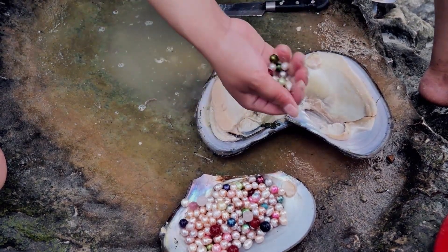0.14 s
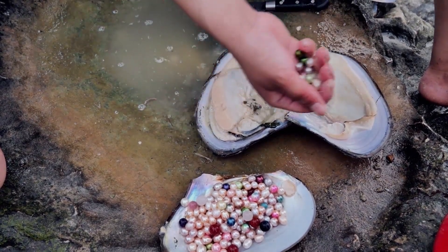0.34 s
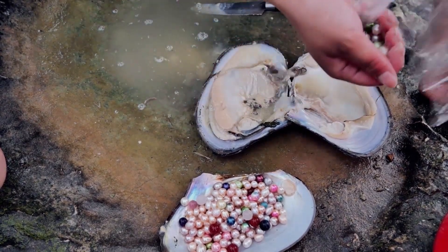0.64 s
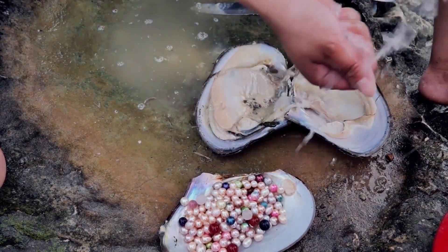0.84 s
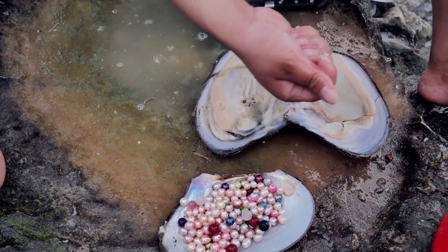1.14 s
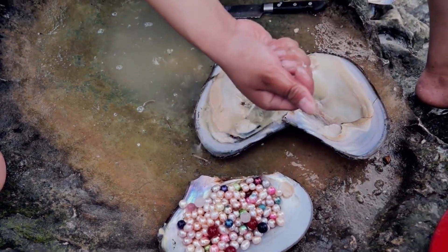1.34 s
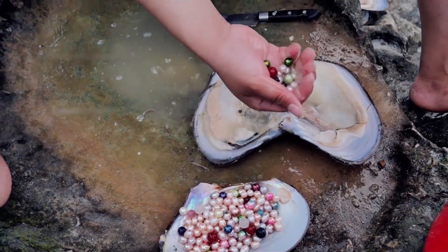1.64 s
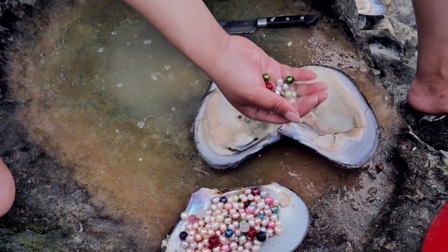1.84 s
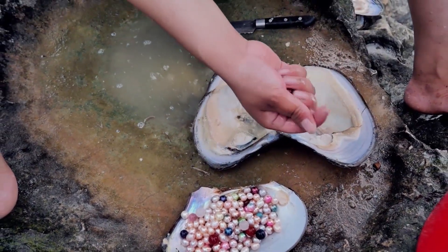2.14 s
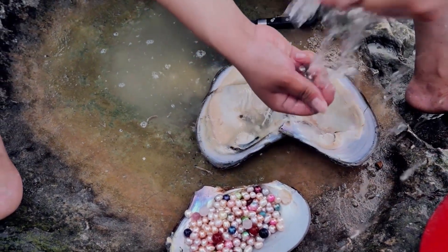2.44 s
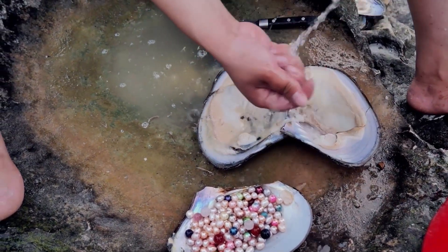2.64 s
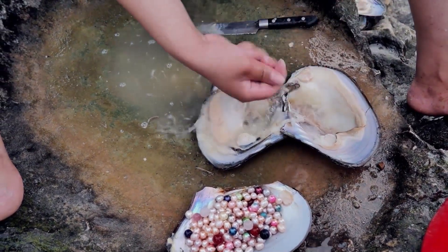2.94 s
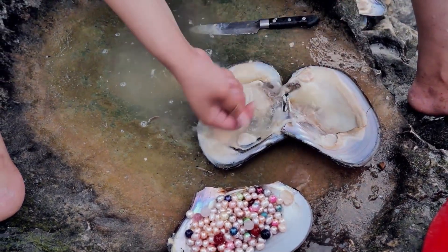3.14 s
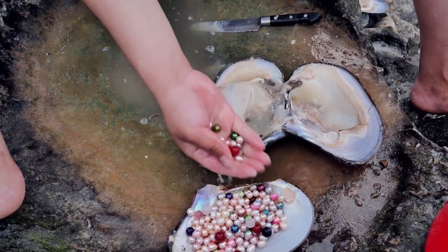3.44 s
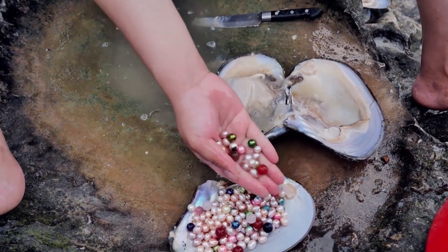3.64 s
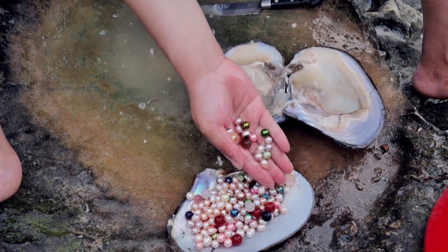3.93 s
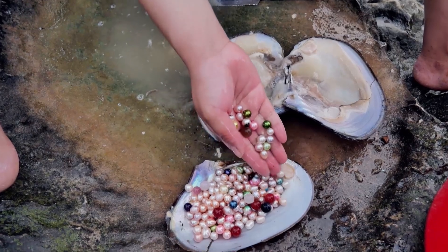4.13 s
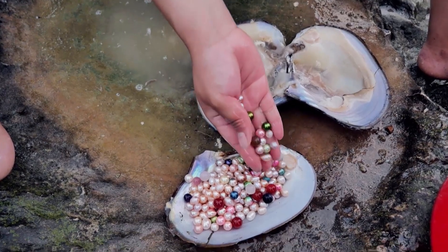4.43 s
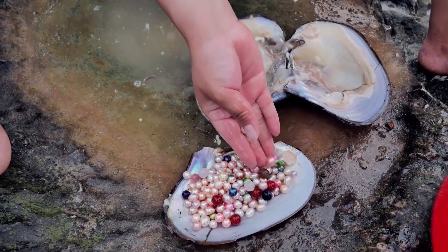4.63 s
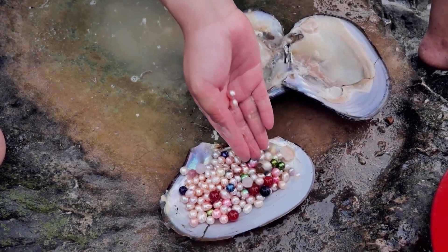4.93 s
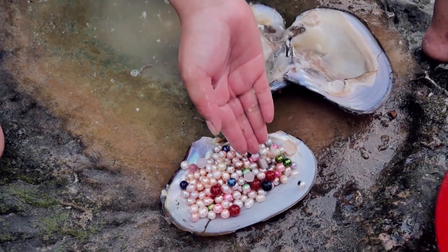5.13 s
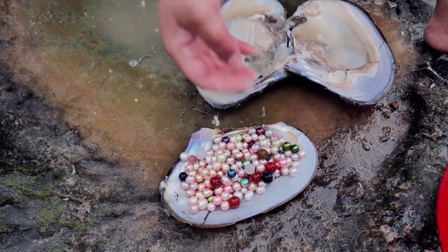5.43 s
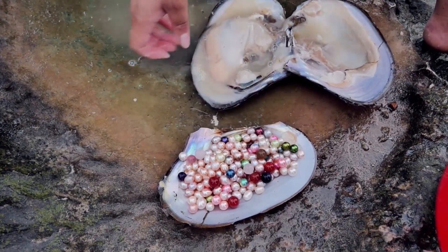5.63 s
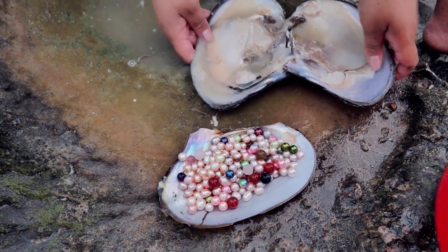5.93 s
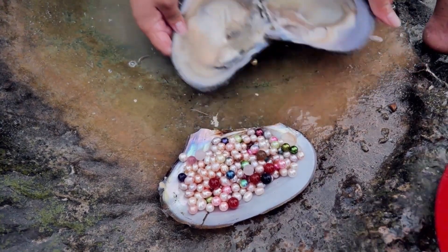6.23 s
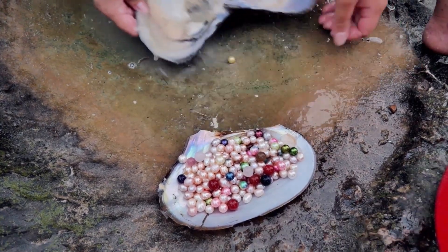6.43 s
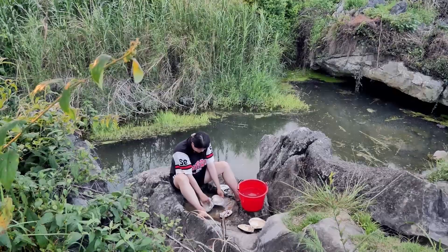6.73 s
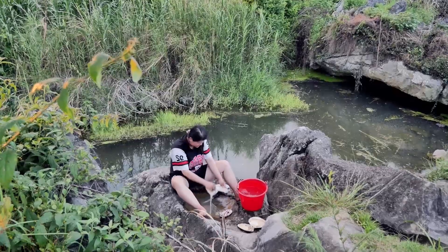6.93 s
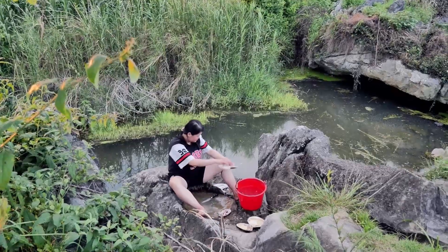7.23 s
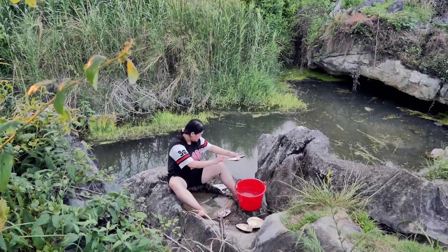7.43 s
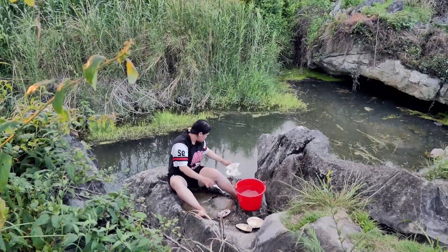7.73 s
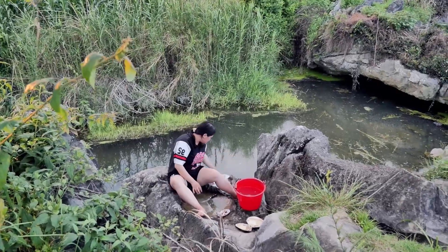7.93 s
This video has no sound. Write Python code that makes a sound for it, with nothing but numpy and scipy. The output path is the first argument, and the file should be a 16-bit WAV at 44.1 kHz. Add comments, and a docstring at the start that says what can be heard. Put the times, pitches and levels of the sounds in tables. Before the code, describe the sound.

Close to the microphone, a hand rinses pearls in a shallow creek pool with quick splashes, bubbles and fine spray. The pearls then click onto a heap in a mussel shell, and an empty shell taps faintly and knocks twice on rock. After a brief silence, the creek rushes softly, heard from the bank, with a few far splashes and a faint pulsing insect. A distant bird whistles now and then.

```python
"""Splashing, close by: a hand rinses pearls in a shallow creek pool, making slaps, ringing air bubbles
and fine spray. The pearls then click onto a heap in a mussel shell, and an empty shell taps faintly and
knocks twice as it is lifted, ringing in its damped modes. After a short silence the creek's rush is
heard from the bank, with a few far splashes and a pulsing insect. A distant bird whistles in both
scenes, and a gain control ducks the whole sound after sharp clicks."""
import sys
import numpy as np
from scipy import signal
from scipy.fft import rfft, irfft
from scipy.io import wavfile
from scipy.ndimage import uniform_filter1d

SR = 44100
rng = np.random.default_rng(int(sys.argv[2]) if len(sys.argv) > 2 else 0)


def dump_mix(stems):
    """Bounce the given channels to the path in sys.argv[1] as a 16-bit WAV at rate SR."""
    frames = np.atleast_2d(stems).T  # one column per channel
    limited = np.clip(frames, -1, 1)  # hard clip at full scale
    pcm = np.round(limited * 32767).astype(np.int16)
    wavfile.write(sys.argv[1], SR, pcm)


N = 355887
TIME, FREQS = np.arange(N) / SR, np.fft.rfftfreq(N, 1 / SR)


def amp(db):
    """Decibels to amplitude ratio."""
    return 10 ** (np.asarray(db) / 20)


def unit_rms(x):
    """Normalisation to unit mean power."""
    return x / np.sqrt(np.mean(x ** 2) + 1e-20)


def unit_onset(sound):
    """Normalisation to unit mean power over the first 5 ms."""
    return sound / np.sqrt(np.mean(sound[:, :SR // 200] ** 2))


def curve_at(points, hz):
    """Interpolation on a logarithmic frequency axis."""
    f, value = np.transpose(points)
    return np.interp(np.log(hz + 1), np.log(f + 1), value)


def add(mix, s, sound):
    """Superposition: a sound joins the mix at time s."""
    part = mix[..., max(0, round(s * SR)):][..., :sound.shape[-1]]
    part += sound[..., :part.shape[-1]]


def coloured(x, spectrum):
    """Zero-phase filtering by a spectrum in dB."""
    return irfft(rfft(x) * amp(curve_at(spectrum, FREQS)), N)


def filtered(x, hz, kind):
    """Second-order, maximally flat filtering."""
    return signal.sosfilt(signal.butter(2, hz, kind, fs=SR, output="sos"), x)


def minimum_phase(gain_db):
    """Causal impulse response: its phase follows from the logarithm of its magnitude."""
    log_gain = np.log(amp(np.r_[gain_db, gain_db[-2:0:-1]]))
    return np.fft.ifft(np.exp(np.conj(signal.hilbert(log_gain)))).real[:len(log_gain) // 2]


def narrow_noise(hz, width_hz, spread):
    """Noise in a bell-shaped band, partly decorrelated between the ears."""
    band = np.exp(-.5 * ((FREQS - hz) / width_hz) ** 2)
    noise = rng.standard_normal(N) + spread * rng.standard_normal((2, N))
    return unit_rms(irfft(rfft(noise) * band, N))


# spectra of the creek, close by and from the bank: f/Hz, relative level/dB
NEAR_CREEK_SPECTRUM = [(25, -37), (90, -12), (170, -14), (270, 1.5), (430, -3), (570, 3), (720, -12),
                       (1850, -22), (2060, -5), (2250, -22.5), (5300, -33), (7200, -30.5), (7900, -42.5),
                       (9400, -38.5), (12000, -60.5)]
FAR_CREEK_SPECTRUM = [(25, -46), (110, -12), (170, -13.5), (290, 3), (440, -3), (570, 2), (750, -10),
                      (1700, -20.5), (2050, -13), (2400, -25.5), (5500, -36), (7200, -28), (7900, -47),
                      (9200, -37.5), (11500, -73)]
# course of the creek's loudness: t/s, level/dB
CREEK_LEVEL = [(0, -39), (4.55, -39), (5.45, -43), (5.8, -41), (6.5, -41.5), (6.8, -40), (8.07, -38.5)]
# likeness of the rush at the two ears: f/Hz, correlation
CREEK_CORRELATION = [(30, 0.048), (90, 0.23), (180, .6), (300, 0.72), (550, 0.0067), (1200, 0.2),
                     (2100, 0.24), (7000, 0.93)]


def creek(spectrum, waver_db):
    """Partly coherent noise: the wavering rush sounds wide where the ears' correlation is low."""
    left, independent = rfft(rng.standard_normal((2, N)))
    correlation = curve_at(CREEK_CORRELATION, FREQS)
    right = correlation * left + np.sqrt(1 - correlation ** 2) * independent
    noise = unit_rms(coloured(irfft(np.array([left, right]), N), spectrum))
    waver = unit_rms(uniform_filter1d(uniform_filter1d(rng.standard_normal(N), size=2500), size=1500))
    return noise * amp(np.interp(TIME, *np.transpose(CREEK_LEVEL)) + waver_db * waver)


def whirr(level_db, hz, width_hz):
    """Narrow-band noise has a pitch: a faint, steady, high whirr in the distance."""
    return amp(level_db) * narrow_noise(hz, width_hz, spread=.5)


def insect(level_db, hz, width_hz, stroke_s):
    """Stridulation: even rasping strokes excite a narrow resonance."""
    strokes = (TIME - 6.832) / stroke_s
    pulses = (.5 + .5 * np.cos(2 * np.pi * strokes)) ** 2
    return amp(level_db) * pulses * narrow_noise(hz, width_hz, spread=0.16)


# falling whistles: t/s, duration/s, relative level/dB
BIRD_WHISTLES = [(3.754, 0.036, -32.5), (4.007, .15, -34.5), (4.37, 0.075, -36), (4.456, .11, -41.5),
                 (7.485, .05, -54.5), (7.96, .15, -51)]


def bird(gain_db, top_hz, end_hz, syllable_s, quaver):
    """Frequency and amplitude modulation: a tone glides down in short, unsteady syllables."""
    out = np.zeros((2, N))
    for s, length, db in BIRD_WHISTLES:
        n = int(length * SR)
        slow_noise = signal.fftconvolve(rng.standard_normal((2, 16384)), np.hanning(120)[None], "same")
        wobble, flutter = unit_rms(slow_noise)[:, :n]
        hz = np.geomspace(top_hz, end_hz, n) * (1 + quaver * wobble)
        syllables = max(1, round(length / syllable_s))
        swell = abs(np.sin(np.pi * syllables * np.arange(n) / n)) * (1 + flutter / 2)
        add(out, s, amp(db + gain_db) * swell * np.sin(2 * np.pi * np.cumsum(hz) / SR))
    return out


def rock_echoes(x, wet_db, t60, size=8000):
    """Scattering: rocks and banks add sparse, exponentially decaying reflections to the direct sound."""
    t = np.arange(size) / SR
    taps = rng.standard_normal((2, size)) * (rng.random((2, size)) < .08) * (t > .002)
    tail = taps * amp(-60 * t / t60)
    tail /= np.linalg.norm(tail, axis=1, keepdims=True)
    return x + amp(wet_db) * signal.oaconvolve(x, tail, axes=1)[:, :N]


def impacts(rows, spectrum, pivot_hz, scatter, decay_s, spread, size=2048):
    """Impulse excitation: a sharp push and dying scatter; harder contacts are brighter above the pivot."""
    hz, t = np.fft.rfftfreq(size, 1 / SR), np.arange(size) / SR
    shelf = np.tanh(2 * np.log2((hz + 1) / pivot_hz)) / 2
    out = np.zeros((2, N))
    for (s, db, bright_db), (mid, side) in zip(rows, rng.standard_normal((len(rows), 2, size))):
        push = scatter * np.exp(-t / decay_s) * np.array([mid + spread * side, mid - spread * side])
        push[:, 0] += 1
        response = minimum_phase(curve_at(spectrum, hz) + bright_db * shelf)
        add(out, s, amp(db) * unit_onset(signal.fftconvolve(push, response[None], axes=1)))
    return out


# spectrum of any water slap, far or near: f/Hz, relative level/dB
SLAP_SPECTRUM = [(150, -29), (450, -10.5), (900, -6.5), (2400, 4), (3500, 7), (4800, -1), (7000, -7.5),
                 (8000, -12.5), (9500, -16.5), (11000, -29), (13000, -52.5)]
# splashes heard from the bank: t/s, level/dB, brightness/dB
FAR_SLAPS = [(7.259, -43, -11), (7.272, -43, -6), (7.349, -44.5, 1), (7.368, -51, -2), (7.405, -48, 14)]


def far_splashes():
    """Distant impacts on water, each smeared by strong scatter."""
    return impacts(FAR_SLAPS, SLAP_SPECTRUM, pivot_hz=3000, scatter=.8, decay_s=0.0062, spread=0.19)


# modes of the empty shell: f/Hz, relative level/dB, T60/s
SHELL_RESONANCES = [(302, 4, 0.033), (513, 3.5, 0.011), (810, -3.5, 0.027), (1016, 3.5, 0.014),
                    (1346, 4, 0.02), (1910, 3, 0.013), (3120, -4, 0.015), (3590, -7.5, 0.021),
                    (4330, -0.5, 0.0038), (6900, -18, 0.0055)]
# the shell knocking on rock: t/s, relative level/dB, brightness/dB
SHELL_KNOCKS = [(5.815, -37, 1), (6.017, -36.5, 7.5), (6.118, -37, 0), (6.138, -36, 6), (6.221, -38.5, -4),
                (6.2567, -18, 5), (6.4343, -21, -14)]


def shell(gain_db, pivot_hz, spread):
    """Modal vibration: knocks ring damped modes; a soft knock stirs those above the pivot less."""
    hz, mode_db, t60 = np.transpose(SHELL_RESONANCES)[:, :, None]
    t = np.arange(4096) / SR
    attack = np.minimum(t / 0.00021, 1)
    shelf = np.tanh(4 * np.log2(hz / pivot_hz)) / 2
    polarity = (-1) ** np.arange(len(hz))[:, None]
    phases = spread * rng.standard_normal((len(SHELL_KNOCKS), len(hz), 1))
    out = np.zeros((2, N))
    for (s, db, bright_db), phase in zip(SHELL_KNOCKS, phases):
        decays = polarity * amp(mode_db + bright_db * shelf - 60 * t / t60)
        ring = np.array([(decays * np.sin(2 * np.pi * hz * t + ear * phase)).sum(0) for ear in (1, -1)])
        radiated = filtered(ring * attack, 190, "high")  # the knocks carry no deep bass
        add(out, s, amp(db + gain_db) * unit_onset(radiated))
    return out


# pearl striking pearl: t/s, level/dB, brightness/dB
PEARL_CLICKS = [(3.7985, -41, -2), (3.9154, -16.5, -2), (3.9669, -30, -1), (4.026, -28, -5),
                (4.053, -19, -6), (4.1953, -40.5, -11), (4.2399, -40.5, -8), (4.304, -35.5, -6),
                (4.455, -33, 12), (4.474, -40, 1), (4.6008, -22, -1.5), (4.611, -19, -4.5),
                (4.6222, -17.5, -5), (4.6293, -16.5, -2.5), (4.669, -26.5, 3), (4.6744, -14.5, -9),
                (4.683, -17, -11), (4.6941, -16.5, 3), (4.7268, -15, -6.5), (4.7384, -20, 1),
                (4.749, -22.5, -3), (4.777, -25, -7.5), (4.8092, -31.5, -8), (4.8306, -34, -12),
                (4.8945, -29, 2), (4.9284, -33.5, -12), (4.962, -27.5, 1.5), (4.9854, -38, -3),
                (5.0165, -21.5, -7.5), (5.04, -24.5, -6), (5.0603, -20, 0), (5.0838, -32.5, -3),
                (5.1327, -29.5, -3), (5.162, -34.5, -9), (5.2341, -24.5, -10.5), (5.2413, -18.5, -6),
                (5.271, -24, -8), (5.293, -26, -5), (5.3086, -22.5, -6), (5.3307, -20, -8.5),
                (5.349, -30, -8), (5.3729, -23.5, 0.5), (5.4425, -45.5, 0)]
# spectrum of one click: f/Hz, relative level/dB
PEARL_SPECTRUM = [(200, -27.5), (900, -19), (1450, -11.5), (2100, 3.5), (2600, 2), (2880, 4.5),
                  (3250, -2.5), (5000, -1.5), (7200, -4), (7850, -8), (9200, -10), (10600, -16),
                  (12000, -30.5), (13500, -45)]


def pearls(rattle_db, within_s):
    """Hard-body collisions: each falling pearl jostles its neighbours into three later, softer clicks."""
    delays = rng.random((len(PEARL_CLICKS), 3))
    rattle = [(s + 0.0028 + within_s * late, db + rattle_db - 8 * late, bright_db / 2)
              for (s, db, bright_db), lateness in zip(PEARL_CLICKS, delays) for late in lateness]
    contacts = [*PEARL_CLICKS, *rattle]
    return impacts(contacts, PEARL_SPECTRUM, pivot_hz=4020, scatter=0.15, decay_s=0.0038, spread=0.15)


# sheets of water thrown, poured or trickling off: t/s, duration/s, relative level/dB, brightness/dB
WATER_SHEETS = [(0, .015, -34.5, 2.5), (0.047, 0.08, -45, -5), (0.124, 0.027, -28.5, -9),
                (0.274, 0.29, -35, -12.5), (0.46, 0.19, -31, -5), (.69, 0.088, -43, -13),
                (0.767, 0.1, -27.5, 1.5), (0.887, 0.11, -51.5, -4.5), (1.021, 0.31, -47, 1.5),
                (1.392, 0.066, -42.5, -10), (1.567, 0.1, -45.5, 4), (1.906, 0.046, -37, -1.5),
                (2.106, 0.19, -34.5, -3), (2.315, .13, -43, 0.5), (2.51, 0.051, -37, 6),
                (2.567, 0.083, -31.5, 9.5), (2.692, 0.45, -51, 2), (3.321, 0.095, -41.5, 10),
                (3.526, .035, -43, 2), (5.552, 0.83, -61, -1), (6.314, 0.035, -50.5, -7)]


def flow(attack_s, release_s, start_db):
    """Incoherent sources add in power: the sheets sum to envelopes of coarse and fine spray."""
    power = np.zeros((2, N))
    for s, length, db, bright_db in WATER_SHEETS:
        t = np.arange(0, length + 8 * release_s, 1 / SR)
        shape = np.minimum(t / attack_s, 1) * np.exp(-np.maximum(t - length, 0) / release_s)
        level = shape * amp(db + start_db * (1 - np.minimum(t / length, 1)))
        fine_ratio = amp(bright_db) ** 2
        add(power, s, np.outer([1, fine_ratio], level ** 2) / (1 + fine_ratio))
    return np.sqrt(power)


def strays(envelope, spread_db, count, rinse_s=3.55):
    """Random events whose strength follows the flow: t/s, level/dB, a random number from 0 to 1."""
    jitter, weakness, chance = rng.random((count, 3)).T
    s = rinse_s * (np.arange(count) + jitter) / count
    flow_db = 20 * np.log10(np.interp(s, TIME, envelope) + 1e-5)
    return zip(s, flow_db - spread_db * weakness, chance)


def bubble(hz, swell_s, rise):
    """Bubble resonance: trapped air rings, its pitch climbing ever more slowly as it nears the surface."""
    age = np.arange(0, 10 * abs(swell_s), 1 / SR) / abs(swell_s)
    climb = rise * age / (1 + age / 10)
    return age * np.exp(1 - age) * np.sin(2 * np.pi * hz * np.cumsum(1 + climb) / SR)


# spectrum of the spray: f/Hz, relative level/dB
SPRAY_SPECTRUM = [(300, -14), (700, 0.5), (1600, 8.5), (2400, 11), (3400, 5), (4600, -3), (7000, -2.5),
                  (8000, -7.5), (9500, -12.5), (11000, -19.5), (13000, -32)]


def spray(coarse, fine, per_s, size_db, mist, split_hz=3000, pitches=90):
    """Shot noise: swarms of tiny bubbles and droplets; a brighter spray holds more of the smallest."""
    swarms = np.zeros((2, 2, N))  # coarse or fine, ear, sample
    for hz, (life, side, rise) in zip(np.geomspace(650, 11000, pitches), rng.random((pitches, 3))):
        births = np.flatnonzero(rng.random(N) < per_s / pitches / SR)
        sizes = amp(size_db * np.minimum(rng.exponential(1, len(births)), 3))
        swell_s = .001 * (life + .4) * np.sqrt(3000 / hz)  # smaller bubbles die sooner
        ring = unit_rms(bubble(hz, swell_s, .035 * rise))
        samples = births[:, None] + np.arange(len(ring))
        voice = np.bincount(samples.ravel(), np.outer(sizes, ring).ravel(), N)[:N]
        swarms[int(hz > split_hz)] += np.array([[1 + side], [2 - side]]) * voice / np.sqrt(len(ring))
    # the finest mist merges into a hiss
    hiss = rng.standard_normal(N) + 0.38 * rng.standard_normal((2, N))
    froth = unit_rms(filtered(hiss, [700, split_hz], "band"))
    fizz = unit_rms(filtered(hiss, split_hz, "high"))
    low = unit_rms(coloured(unit_rms(swarms[0]) + mist * froth, SPRAY_SPECTRUM))
    high = unit_rms(coloured(unit_rms(swarms[1]) + mist * fizz, SPRAY_SPECTRUM))
    return coarse * low + fine * high


def satellites(parents, gain_db, within_s):
    """Pinch-off: each distinct bubble sheds two smaller ones, higher, softer and briefer."""
    chance = rng.random((len(parents), 2, 2))
    return [(s + within_s * late, hz * (1.2 + 0.906 * small), db + gain_db - 6 * late, swell / 2, rise / 2)
            for (s, hz, db, swell, rise), shed in zip(parents, chance) for late, small in shed]


def gurgle(coarse, rise, gain_db, low_hz, high_hz, swell_cycles):
    """Constant-Q damping: of the middle-sized bubbles churned up by the flow, the larger ring longer."""
    rows = []
    for s, db, size in strays(coarse, spread_db=7.5, count=260):
        hz = high_hz * (low_hz / high_hz) ** (size * size)
        rows.append((s, hz, db + gain_db, swell_cycles / hz, rise * (1 + 2 * size)))
    return rows


# the most distinct ringing bubbles: t/s, f/Hz, relative peak level/dB, swell time/s
DISTINCT_BUBBLES = [(.1122, 593, -17.5, 0.0055), (0.1336, 1180, -9.5, .0016), (0.1462, 1470, -12.5, .0013),
                    (0.1488, 2300, -9, .0011), (0.1664, 1330, -12.5, 0.0011), (.176, 3420, -11, 0.00075),
                    (.2475, 661, -18.5, 0.0055), (0.321, 1250, -15.5, 0.0028), (0.3372, 2400, -13, 0.0022),
                    (0.3545, 804, -19, 0.003), (0.36, 1780, -19.5, .0023), (0.421, 2250, -14.5, 0.0038),
                    (.4705, 715, -19.5, 0.0053), (.471, 3160, -17.5, 0.0046), (0.5251, 990, -16.5, 0.0017),
                    (0.5547, 1220, -19, .0045), (.6113, 2240, -10, 0.0008), (.6129, 621, -19, 0.0082),
                    (.6467, 1326, -19.5, 0.0026), (0.6633, 1746, -18.5, 0.0023),
                    (0.693, 1093, -23.5, 0.003), (0.775, 1350, -17.5, 0.002), (.8014, 2460, -14, 0.0016),
                    (0.8008, 3330, -18.5, 0.0044), (0.824, 860, -21, 0.0019), (0.8697, 2835, -15, 0.0033),
                    (1.191, 1500, -32.5, 0.0041), (1.2617, 830, -21, 0.0028), (1.4081, 1257, -18, 0.0037),
                    (1.424, 2660, -30.5, .0022), (1.6662, 1996, -12, 0.0013), (1.882, 2350, -28.5, .0027),
                    (1.9183, 1610, -14.5, 0.0019), (2.0743, 2730, -12, 0.00036), (2.083, 1648, -19, 0.0064),
                    (2.115, 1090, -17.5, 0.0034), (2.132, 1785, -9, 0.0011), (2.1725, 3220, -15.5, 0.001),
                    (2.241, 1027, -26, .006), (2.397, 1590, -18.5, 0.0014), (2.5787, 2940, -17, 0.0015),
                    (2.677, 1613, -15, 0.0015), (3.23, 1484, -23, 0.0025)]
# glugs of the hollow that closes behind the hand: t/s, f/Hz, relative peak level/dB
CAVITY_GLUGS = [(.1325, 538, -16.5), (.3613, 543, -19.5), (2.1212, 491, -10.5), (2.1275, 566, -16.5),
                (2.1724, 820, -22)]


def bubbles(coarse, rise, glug_swell_s, glug_rise, spread):
    """Air entrainment: the hand beats bubbles into the pool, each ringing at its own spot."""
    rows = [(*row, rise) for row in DISTINCT_BUBBLES]
    rows += [(*row, glug_swell_s, glug_rise) for row in CAVITY_GLUGS]
    rows += satellites(rows, gain_db=-7.5, within_s=.012)
    rows += gurgle(coarse, rise, gain_db=9, low_hz=648, high_hz=2618, swell_cycles=3.75)
    out = np.zeros((2, N))
    for (s, hz, db, swell_s, climb), (side, phase) in zip(rows, rng.standard_normal((len(rows), 2))):
        ring = signal.hilbert(bubble(hz, swell_s, climb))
        ears = np.exp(spread * (side / 2 + 1j * phase) * np.array([[1], [-1]]))  # level and phase shifts
        add(out, s, amp(db) * (ears * ring).real)
    return out


# water slapping on water, hand and shell: t/s, relative level/dB, brightness/dB
NEAR_SLAPS = [(.1754, -22.5, -9), (.4224, -24, -15), (.4496, -25, -4), (.4882, -23, -8), (.5589, -32, -10),
              (.6468, -24.5, -23), (.7756, -21.5, -5), (.7866, -22, -6), (.8259, -19.5, -8),
              (.9266, -28, 16), (1.0509, -39.5, 17), (1.1394, -33, 42), (1.2632, -22.5, -31),
              (1.2947, -28.5, 7), (1.3117, -37, 1), (1.3278, -35, -16), (1.468, -40, 18),
              (1.5718, -23.5, 3.5), (1.6103, -32, -16), (1.6542, -28, -5), (1.8278, -38, 55),
              (1.9402, -27, 0), (1.9525, -25.5, -11.5), (2.3521, -27, -11), (2.4341, -29, 5),
              (2.4843, -23.5, 8), (2.5742, -24.5, -7), (2.6229, -24, 9), (2.675, -26.5, 0),
              (2.7775, -32, -4), (2.8766, -32, 48), (3.0383, -30.5, 33), (3.0642, -37, 20),
              (3.2296, -23.5, -2), (3.2789, -39.5, 2), (3.3526, -33, 11), (3.3648, -27.5, 12),
              (3.408, -29, 7), (3.471, -36.5, 7), (3.5363, -26, 9), (3.5487, -28, 24)]


def slaps(envelope, drop_db, drop_bright_db):
    """Liquid impact: water strikes in sharp slaps, and stray drops fall back as small ones."""
    drops = [(s, db + drop_db, drop_bright_db * (2 * chance - 1))
             for s, db, chance in strays(envelope, spread_db=15.5, count=110)]
    contacts = [*NEAR_SLAPS, *drops]
    return impacts(contacts, SLAP_SPECTRUM, pivot_hz=2960, scatter=0.24, decay_s=0.0042, spread=0.086)


# direction of the splashing: f/Hz, left minus right level/dB
RINSE_BALANCE = [(600, -1), (1000, 3.5), (3300, 2.5), (6500, -0.5), (11000, 0)]


def rinsing():
    """Spray, bubbles and slaps superpose; an interaural level difference leans their mid range left."""
    coarse, fine = flow(attack_s=0.013, release_s=0.023, start_db=-0.5)
    water = amp(-1) * spray(coarse, fine, per_s=4200, size_db=8.0, mist=0.62)
    water += amp(-.5) * bubbles(coarse, rise=0.026, glug_swell_s=0.006, glug_rise=0.18, spread=0.41)
    water += amp(-1) * slaps(np.hypot(coarse, fine), drop_db=7, drop_bright_db=5.5)
    lean = np.array(RINSE_BALANCE)
    return np.array([coloured(water[0], lean * [1, .5]), coloured(water[1], lean * [1, -.5])])


def scene():
    """Superposition: water, pearls and shell close by; a silence; then the creek from the bank."""
    near_ends_s, far_begins_s = 6.519, 6.799
    water = rinsing()
    solids = pearls(rattle_db=-11.5, within_s=.022) + shell(gain_db=0.46, pivot_hz=1450, spread=0.48)
    near = rock_echoes(water, wet_db=-9.5, t60=0.046) + rock_echoes(solids, wet_db=-13, t60=0.065)
    near += creek(NEAR_CREEK_SPECTRUM, waver_db=1.0) + whirr(level_db=-62, hz=2018, width_hz=100)
    far = rock_echoes(far_splashes(), wet_db=-10, t60=0.19)
    far += creek(FAR_CREEK_SPECTRUM, waver_db=0.04) * amp([[-.8], [.8]])  # slightly to the right
    far += insect(level_db=-54.5, hz=6480, width_hz=310, stroke_s=.0915)
    whistles = bird(gain_db=-1.5, top_hz=3150, end_hz=2060, syllable_s=.048, quaver=.022)
    whistles = rock_echoes(whistles, wet_db=-2.5, t60=0.093)
    return near * (TIME < near_ends_s) + far * (TIME > far_begins_s) + whistles


def record(dry):
    """Compression: treble above a threshold ducks the whole sound; a low-pass then limits the band."""
    threshold_db, share_removed, recovery_db_per_s, attack_s = -27.5, 0.63, 73, .008
    treble = filtered(dry.mean(0), 4000, "high")
    level_db = 10 * np.log10(abs(uniform_filter1d(treble ** 2, size=64)) + 1e-12)
    fall_db = TIME * recovery_db_per_s
    held_db = np.maximum.accumulate(level_db + fall_db) - fall_db
    excess_db = np.maximum(held_db - threshold_db, 0)
    pole = np.exp(-1 / (attack_s * SR))
    ducked = dry / amp(share_removed * signal.lfilter([1 - pole], [1, -pole], excess_db))
    low_pass = signal.firwin(255, 12600, window=("kaiser", 8), fs=SR)
    return signal.oaconvolve(ducked, low_pass[None], "same")


dry = scene()
out = record(dry)
dump_mix(out)
```